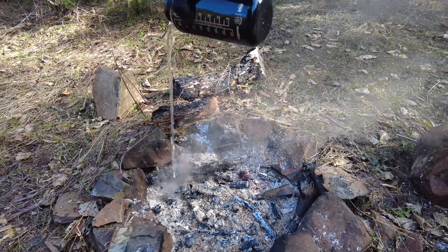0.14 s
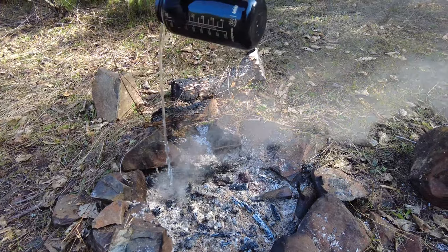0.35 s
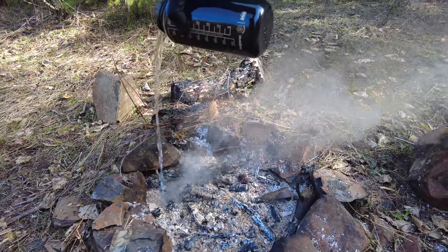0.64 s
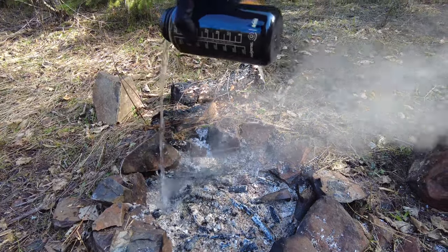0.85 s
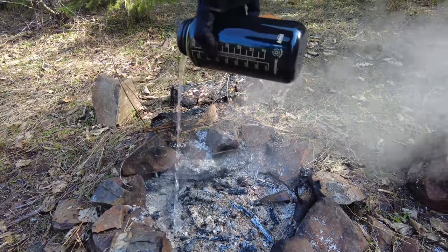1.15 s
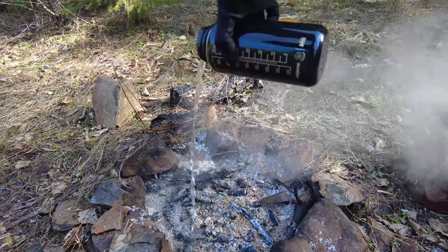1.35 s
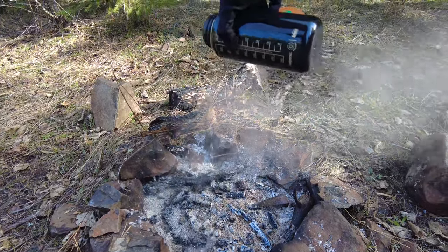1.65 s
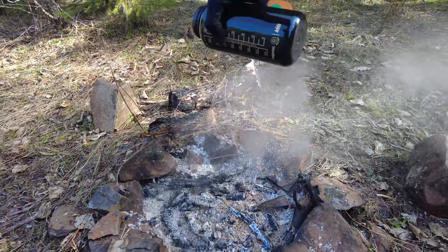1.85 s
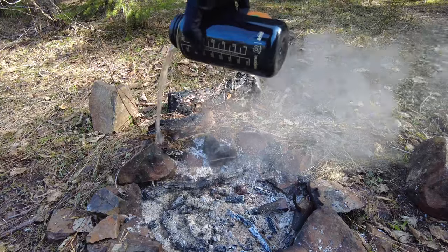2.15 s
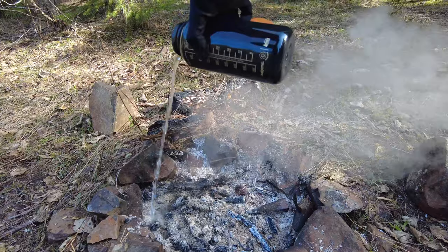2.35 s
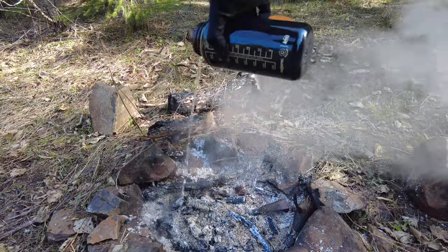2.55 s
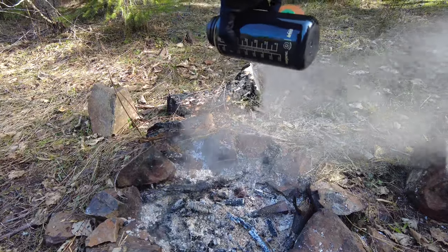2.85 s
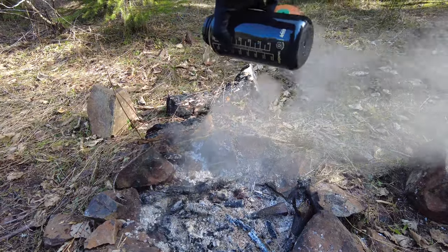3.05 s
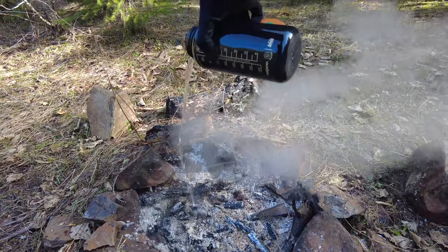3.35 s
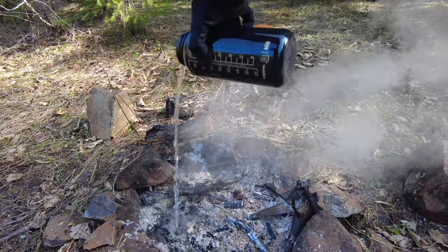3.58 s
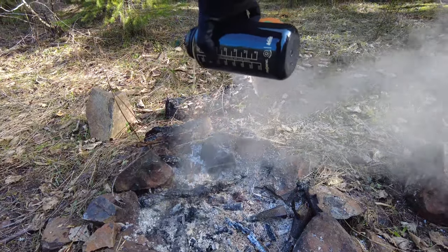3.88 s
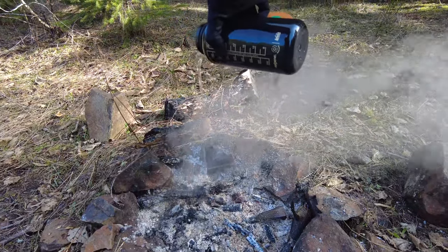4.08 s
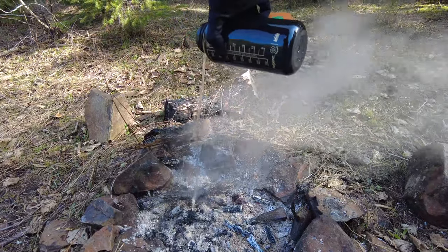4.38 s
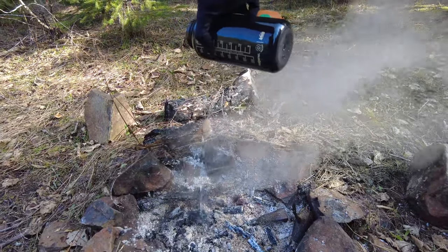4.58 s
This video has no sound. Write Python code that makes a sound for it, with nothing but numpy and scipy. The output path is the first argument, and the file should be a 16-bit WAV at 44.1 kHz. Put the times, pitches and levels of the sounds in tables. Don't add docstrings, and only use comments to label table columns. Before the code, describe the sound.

Close outdoor sound of water poured unevenly onto hot ash and embers, lasting about four and a half seconds. It starts already sizzling; strong gulps in the first half second give dull, low steam puffs over a fluttering rumble, with rough bubbling, fizz and spit. From 0.5 to 1.9 seconds shorter spurts come, with puffs near 0.8-0.95, 1.4 and 1.7. The pour nearly stops around 2.0-2.3, leaving a weak simmer, then returns at 2.4, with a cluster of coal cracks near 2.6 and firm puffs at 2.8. It sinks again around 3.0-3.4. The heaviest thudding bursts run from 3.4 to 3.8, followed by thin bright mist hisses and crisp ticks around 3.8-4.1. A quieter simmer follows until a last strong splash near 4.5. Soft low wind buffets the small stereo microphone, slightly more around 3.3-3.5. The sizzle is slightly ringing and metallic, different on each side, with no echo.

```python
import sys
import numpy as np
from scipy import signal
from scipy.fft import rfft, irfft, next_fast_len
from scipy.io import wavfile
from scipy.ndimage import uniform_filter1d, map_coordinates

SR = 44100
rng = np.random.default_rng(int(sys.argv[2]) if len(sys.argv) > 2 else 0)


def how_loud(loudness_db):
    steps = np.asarray(loudness_db, float) / 20
    return 10 ** steps


def unload_wav(signal):
    wavfile.write(
        sys.argv[1],
        SR,
        np.round(np.clip(np.atleast_2d(signal).T, -1, 1) * 32767).astype(np.int16),
    )


N = 208152

# start t/s, length t/s, steam trapped in the ash level/dB,
# sizzle on the embers level/dB
GULPS = [(-.6, 0.79, -42.5, -49.5), (0.237, .16, -42, -52), (0.425, .08, -43.5, -50),
         (0.523, 0.2, -48.5, -56), (0.779, 0.071, -45, -53.5), (0.876, 0.096, -47.5, -55),
         (0.993, .1, -49, -57.5), (1.1, 0.15, -56.5, -59.5), (1.197, 0.13, -51, -53.5),
         (1.38, 0.083, -49, -54.5), (1.48, 0.078, -52.5, -57.5), (1.59, 0.037, -46.5, -54),
         (1.672, 0.077, -43.5, -53.5), (1.774, 0.053, -44, -57.5), (1.885, .08, -50.5, -65.5),
         (2.05, 0.31, -62, -80), (2.365, 0.01, -46.5, -53.5), (2.412, 0.029, -48.5, -52.5),
         (2.492, 0.083, -54, -60.5), (2.65, 0.2, -45, -53.5), (2.777, 0.081, -44.5, -62.5),
         (2.89, 0.098, -55.5, -98.5), (3.017, 0.01, -54.5, -71), (3.405, 0.013, -44.5, -55.5),
         (3.488, 0.28, -40.5, -52.5), (3.803, 0.18, -57.5, -62), (3.996, 0.2, -46, -57.5),
         (4.23, 0.72, -55, -63.5), (4.462, 0.043, -39, -52), (4.548, .25, -50.5, -59)]
# t/s, peak level/dB, pitch f/Hz
PUFFS = [(0.0936, -30.5, 217), (0.198, -30.5, 213), (0.27, -34, 109), (0.379, -29.5, 136),
         (0.8041, -29.5, 172), (0.857, -32, 155), (0.9084, -34.5, 212), (0.9517, -33.5, 177),
         (1.399, -34.5, 174), (1.444, -37.5, 136), (1.641, -35, 147), (1.7022, -32.5, 168),
         (1.79, -32, 153), (2.3697, -38, 179), (2.6366, -35, 190), (2.6676, -35, 220), (2.7029, -40, 121),
         (2.7852, -27, 121), (2.8178, -29, 133), (3.4212, -29.5, 174), (3.5025, -30, 120),
         (3.5307, -28, 190), (3.5705, -30, 175), (3.624, -25, 147), (3.7077, -29.5, 153),
         (3.7788, -24.5, 195), (4.022, -34.5, 147), (4.0985, -35, 196), (4.146, -34, 134.7),
         (4.485, -29, 180)]


def steam():
    trapped_db, ember_db = np.transpose(GULPS)[2:]
    puff_db = wetting(trapped_db, fall=170, soak_db=-17, soak_s=0.2)
    sizzle_db = wetting(ember_db, fall=130, soak_db=-3.5, soak_s=0.54)
    sputter = 0.48 * wobble(30) + 0.27 * wobble(70)
    lift = splat(decay_s=0.00077)
    low = how_loud(puff_db + 0.3) * puffing(sputter)
    middle = how_loud(-1.5) * layer_gain("boil", sizzle_db) * boiling(sputter, lift)
    return low + middle + fizzing(sizzle_db, sputter, lift)


def puffing(sputter):
    # f/Hz, level/dB per Hz
    rumble = [(15, -61), (25, -16), (59, -8), (155, 0.5), (390, -11.5), (568, -25.5), (700, -28.5),
              (910, -41), (1540, -120)]
    thuds = grains(count=600, hz=172.6, spread=1.787, cycles=0.89, uneven_db=0.0, size=1500)
    rush = coloured(patchy(depth_db=0.0), rumble)
    return unit(how_loud(2.4 * sputter) * (0.49 * thuds + 0.86 * rush))


def boiling(sputter, lift):
    # f/Hz, level/dB per Hz
    boil_colour = [(250, -35), (500, -9), (700, -1), (830, 0), (1000, -2), (1330, -2), (1600, -10),
                   (1850, -9), (2250, -14), (4000, -35)]
    bubbles = grains(count=3000, hz=1300, spread=1.93, cycles=1.0, uneven_db=2.5, size=300)
    rush = coloured(patchy(depth_db=1.98) + 0.035 * bubbles, boil_colour)
    return unit(how_loud(1.9 * sputter + 2.6 * lift) * rush)


def fizzing(sizzle_db, sputter, lift):
    # f/Hz, level/dB per Hz
    fizz_colour = [(1200, 3), (2200, -7), (3200, -4.5), (3800, -6.5), (4800, -32), (8000, -49)]
    spit_colour = [(2200, -49), (3600, -5), (4300, 2.5), (5500, -4.5), (6800, -4.5), (10000, -36)]
    hiss_colour = [(4000, -29), (6500, -8.5), (8000, -1.5), (11300, -1.5), (12200, -12), (14000, -18)]
    spray_colour = [(9000, -30), (11500, 0), (12400, -1), (13200, 5), (14200, 0.5), (15700, 7.5)]
    drops = grains(count=4000, hz=4500, spread=2.16, cycles=0.78, uneven_db=5, size=64)
    fizz = coloured(patchy(depth_db=-1.5) + 0.14 * drops, fizz_colour)
    spit = coloured(patchy(depth_db=-0.4) + 0.27 * drops, spit_colour)
    hiss = coloured(patchy(depth_db=1.44) + 0.62 * drops, hiss_colour)
    spray = coloured(patchy(depth_db=1.4), spray_colour)
    fizz = unit(how_loud(0.7 * sputter + 1.1 * lift) * fizz)
    spit = unit(how_loud(1.5 * sputter + 0.85 * lift) * spit)
    hiss = unit(how_loud(1.15 * sputter + 0.43 * lift) * hiss)
    spray = unit(how_loud(0.73 * sputter + 1.1 * lift) * spray)
    total = how_loud(-6.0) * layer_gain("fizz", sizzle_db) * fizz
    total = total + how_loud(-12.5) * layer_gain("spit", sizzle_db) * spit
    total = total + how_loud(-11.0) * layer_gain("hiss", sizzle_db) * hiss
    return total + how_loud(-16) * layer_gain("spray", sizzle_db) * spray


def wetting(db, fall, soak_db, soak_s):
    rise_s, rate = 0.0042, 1000
    t = np.arange(-1000, N / SR * rate + 2) / rate
    start, length = np.transpose(GULPS)[:2, :, None]
    rise = np.clip((t - start) / rise_s, 0, 1)
    shape = rise * how_loud(-fall * np.maximum(t - start - length, 0))
    power = np.sum((how_loud(db)[:, None] * shape) ** 2, axis=0)
    keep = np.exp(-1 / (rate * soak_s))
    power = power + how_loud(2 * soak_db) * signal.lfilter([1 - keep], [1, -keep], power)
    return np.interp(np.arange(N) / SR, t, 10 * np.log10(power + 1e-12))


def layer_gain(name, sizzle_db):
    grows = dict(boil=1.13, fizz=1.0, spit=0.95, hiss=0.61, spray=0.83)
    layer_hz = dict(boil=1200, fizz=2800, spit=5000, hiss=9000, spray=14000)
    usual_db = -56
    return how_loud(usual_db + grows[name] * (sizzle_db - usual_db) + mist(layer_hz[name]))


def mist(centre_hz):
    # middle t/s, half length t/s, lift level/dB, pitch f/Hz
    jets = [(0.212, 0.031, 4, 7000), (0.232, 0.032, 5, 13000), (0.537, 0.06, 2.5, 7040),
            (0.736, 0.046, 6, 6000), (0.815, 0.058, 6, 11700), (0.988, .05, 2, 4500),
            (1.094, 0.081, 5.5, 5870), (.92, .06, 1, 14000), (1.134, 0.14, 3, 14100),
            (1.58, 0.098, 4, 7000), (2.3, 0.077, -3, 10000), (2.39, 0.025, 2, 13000),
            (2.49, 0.052, 9.5, 14000), (2.574, 0.12, 4, 4500), (2.73, .05, 4.5, 10000),
            (3.343, 0.057, -5, 1000), (3.45, 0.042, 1.5, 4000), (3.46, .1, -2, 14000), (3.6, 0.03, 5, 5000),
            (3.685, 0.036, 6, 11000), (3.825, 0.088, 8.5, 14000), (3.835, 0.056, 7, 4000),
            (3.97, 0.043, 11, 15200), (4.05, 0.044, 4.5, 11000), (4.197, 0.037, 1, 9000),
            (4.382, 0.094, 3, 5000), (4.57, 0.077, 3.5, 13000), (4.628, 0.064, 7, 6000)]
    reach_octaves = 0.8
    rows = []
    for s, half_s, db, hz in jets:
        octaves = np.log2(hz / centre_hz)
        rows.append((s, half_s, db * np.exp(-(octaves / reach_octaves) ** 2)))
    return bells(rows)


def splat(decay_s):
    at = np.round(np.transpose(PUFFS)[0] * SR).astype(int)
    t = np.arange(2000) / SR / decay_s
    return signal.fftconvolve(np.bincount(at, minlength=N), t * np.exp(1 - t))[:N]


def puffs():
    s, db, hz = np.transpose(PUFFS)
    return blips(s, how_loud(db - 1.9), hz, cycles=0.37, size=2500)


def cracks():
    # t/s, splinter level/dB, lowest f/Hz, highest f/Hz
    coals = [(.178, -42.5, 7350, 8200), (.2024, -48, 7500, 11200), (.2245, -49.5, 3500, 5270),
             (.5317, -49, 2680, 6600), (.623, -51, 1520, 2500), (.6327, -54.5, 2620, 3150),
             (.6495, -50.5, 1300, 8150), (.655, -44.5, 4500, 12000), (.687, -50, 1100, 1700),
             (.9936, -50, 3930, 5800), (1.61, -51, 8000, 11200), (2.368, -53, 1210, 14600),
             (2.5515, -47.5, 4040, 14600), (2.606, -47.5, 2760, 5200), (2.6062, -51, 6500, 15000),
             (2.6195, -50.5, 4000, 12000), (3.3035, -55, 5000, 12500), (3.311, -53, 4500, 14200),
             (3.4096, -87, 1440, 5970), (3.9165, -64, 8950, 11300), (3.932, -45.5, 8000, 11200),
             (3.948, -48, 7500, 11200), (3.9845, -53, 7500, 11500), (4.079, -50, 8500, 11200),
             (4.084, -50, 8040, 12000), (4.469, -55, 2580, 3670)]
    s, db, low_hz, high_hz = np.repeat(coals, repeats=6, axis=0).T
    late, stray = rng.random((len(s), 2)).T
    place = (np.arange(len(s)) % 6 + stray) / 6
    hz = low_hz * (high_hz / low_hz) ** place
    gain = how_loud(db) * hz / np.sqrt(low_hz * high_hz)
    return blips(s + 0.0015 * late, gain, hz, cycles=1.8, size=300)


def breeze():
    # middle t/s, half length t/s, lift level/dB
    gusts = [
        (.42, .05, -1),
        (2.25, 0.033, 3),
        (3.28, 0.043, 5),
        (3.48, 0.031, 9),
        (4.25, 0.34, 2),
    ]
    # f/Hz, level/dB per Hz
    air = [(25, -13), (40, -5.5), (65, 7), (110, -7), (200, -10), (400, -34)]
    level_db = -58 + 0.37 * wobble(3.03) + bells(gusts)
    return how_loud(level_db) * coloured(patchy(depth_db=-2.3), air)


def port(cavity, hz):
    lift = 1
    for centre, width, db in cavity:
        spring = centre * centre - hz * hz
        damping = 1j * hz * width
        lift = lift * (spring + damping * how_loud(db)) / (spring + damping)
    return lift


def blips(s, gain, hz, cycles, size):
    turn = np.arange(size) / SR * hz[:, None]
    fade = turn / cycles * np.exp(1 - turn / cycles)
    swing = -gain[:, None] * np.sin(2 * np.pi * turn) * fade
    at = np.round(s * SR).astype(int)[:, None] + np.arange(size)
    return np.bincount(at.ravel(), swing.ravel(), N + size)[:N]


def grains(count, hz, spread, cycles, uneven_db, size):
    swarms = []
    for _ in range(3):
        when, pitch, big = rng.random((count, 3)).T
        gain = how_loud(-uneven_db * np.log(1.02 - big))
        swarms.append(blips(when * N / SR, gain, hz * spread ** (2 * pitch - 1), cycles, size))
    return unit(np.array(swarms))


def patchy(depth_db):
    z = signal.stft(rng.standard_normal((3, N)), nperseg=256)[2]
    field = rng.standard_normal(z.shape[1:])
    for axis in (0, 1):
        field = uniform_filter1d(field, size=8, axis=axis)
    return signal.istft(z * how_loud(depth_db * unit(field)), nperseg=256)[1][:, :N]


def wobble(rate):
    knots = rng.standard_normal(int(N * rate / SR) + 4)
    return map_coordinates(knots, [np.arange(N) * rate / SR])


def bells(rows):
    t = np.arange(0, N / SR + 0.004, 0.002)
    lift = sum(db * np.exp(-((t - s) / half_s) ** 2) for s, half_s, db in rows)
    return np.interp(np.arange(N) / SR, t, lift)


def unit(x):
    return x / np.sqrt(np.mean(x ** 2) + 1e-20)


def along(points, hz):
    f, v = np.transpose(points)
    return np.interp(np.log(hz + 1), np.log(f + 1), v)


def filtered(x, response):
    m = next_fast_len(N + SR // 4)
    return irfft(rfft(x, m) * response(np.fft.rfftfreq(m, 1 / SR)), m)[..., :N]


def coloured(x, spectrum):
    return unit(filtered(x, lambda hz: how_loud(along(spectrum, hz))))


def scene():
    # f/Hz, width f/Hz, lift level/dB
    left_port = [(2980, 242, 13), (4060, 215, 5), (4950, 77, 9), (5650, 200, 11.5), (7840, 180, 8),
                 (10750, 89, 8), (12500, 210, 12), (12800, 550, -6.5)]
    right_port = [(3010, 410, 17), (4290, 99, 4), (5000, 210, 7), (5800, 1700, 2), (8350, 120, -11),
                  (11200, 1100, -2.5)]
    # f/Hz, phase/radians
    left_lead = [(60, 0), (230, .45), (470, .6), (600, 1.8), (770, 2.6), (1000, 3.0), (1180, 2.3),
                 (1235, .05), (1370, .08), (1580, .55), (1830, .08), (2000, .4), (2280, .2), (2600, .9),
                 (3200, .6), (9000, .4), (12000, 1.5)]
    # f/Hz, level/dB over the direct sound
    scatter = [(40, -16), (100, -22), (300, -12), (500, -6), (800, -13), (1150, -13), (1300, -16),
               (1600, -6), (1830, -11), (2020, -4), (2280, -7), (2550, 0), (4000, 0), (15000, 4)]

    def ports(hz):
        lead = np.exp(0.5j * along(left_lead, hz))
        return np.array([port(left_port, hz) * lead, port(right_port, hz) / lead])

    def stones(hz):
        return how_loud(along(scatter, hz)) * np.abs(ports(hz)) ** 0.35

    direct, *scattered = steam() + breeze()
    near = filtered(direct + puffs() + cracks(), ports)
    return near + filtered(np.array(scattered), stones)


def roll_off(x):
    return signal.sosfilt(signal.butter(12, 16820, fs=SR, output="sos"), x)


def record(dry):
    # f/Hz, left minus right level/dB
    imbalance = [(300, -0.5), (1100, 1.5), (1500, -1), (3500, 5.5), (9000, 0), (15000, 5.5)]
    top_hz = (15740, 15830)

    def camera(hz):
        tilt = how_loud(np.array([[0.5], [-0.5]]) * along(imbalance, hz))
        low_cut = hz ** 4 / (hz ** 4 + 26.6 ** 4)
        top = np.where(hz < top_hz[0], 1, how_loud(-13) * (hz < top_hz[1]))
        return tilt * low_cut * top

    return roll_off(filtered(dry, camera))


dry = scene()
out = record(dry)
unload_wav(out)
```